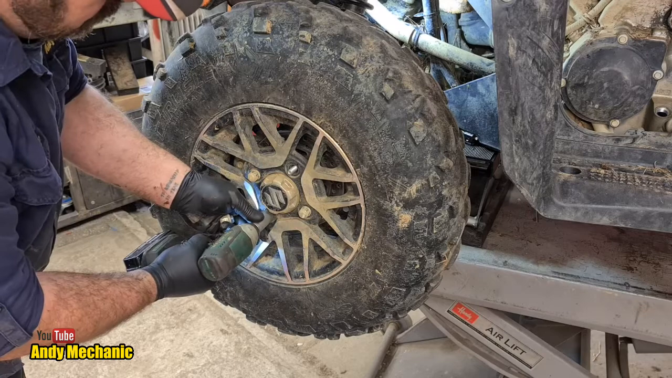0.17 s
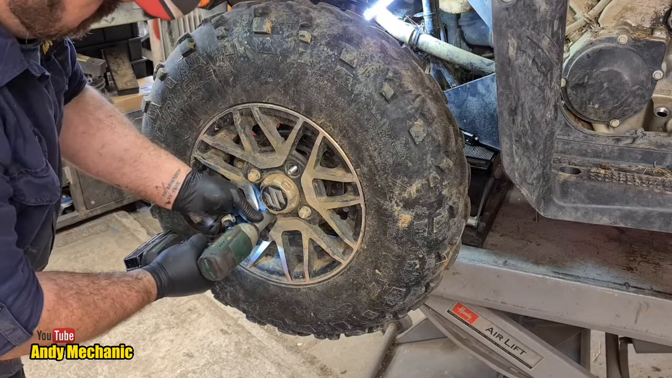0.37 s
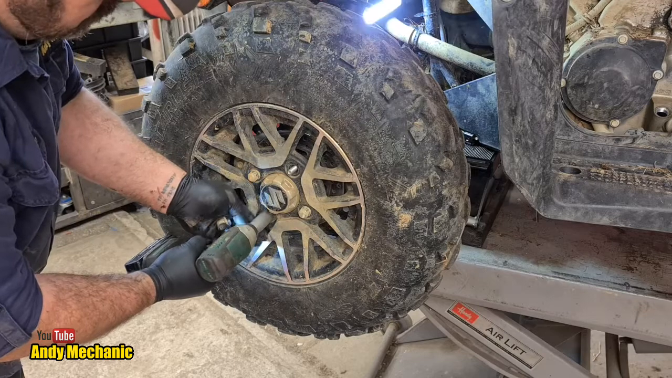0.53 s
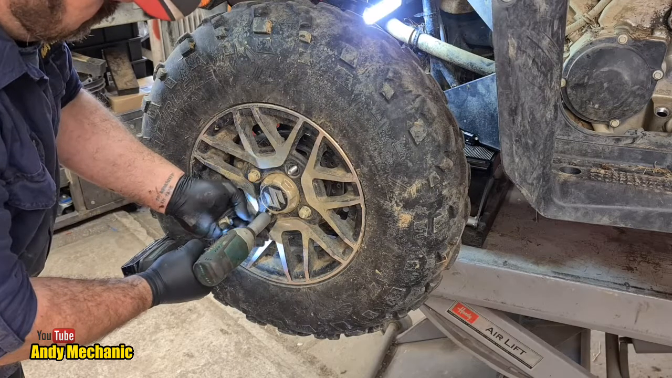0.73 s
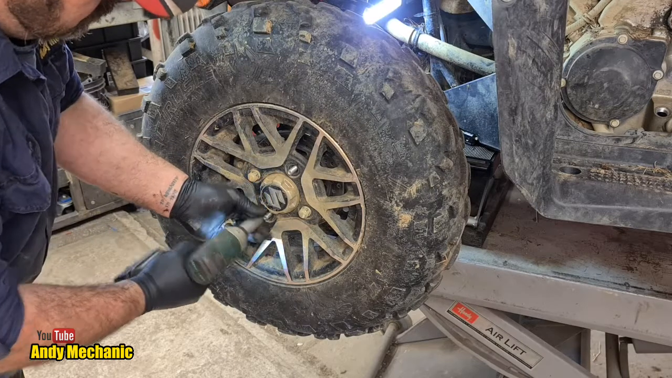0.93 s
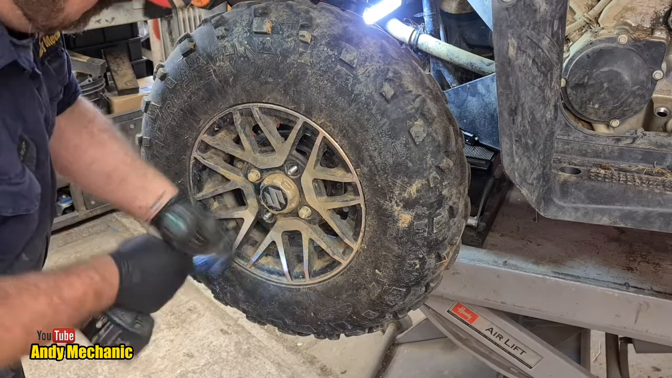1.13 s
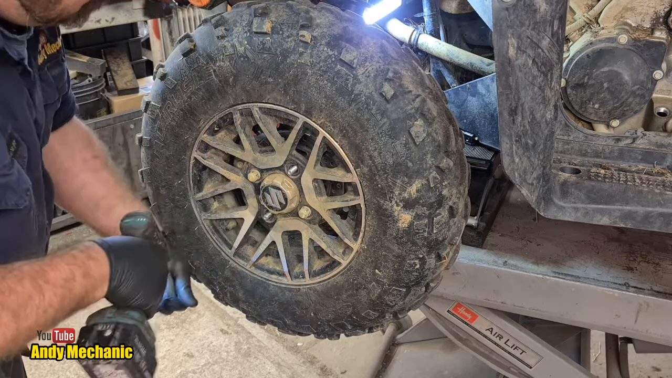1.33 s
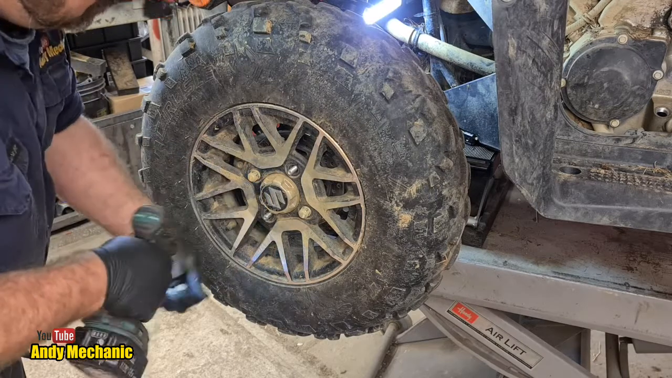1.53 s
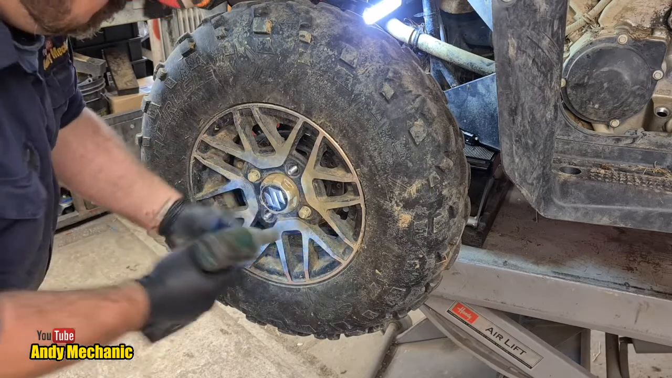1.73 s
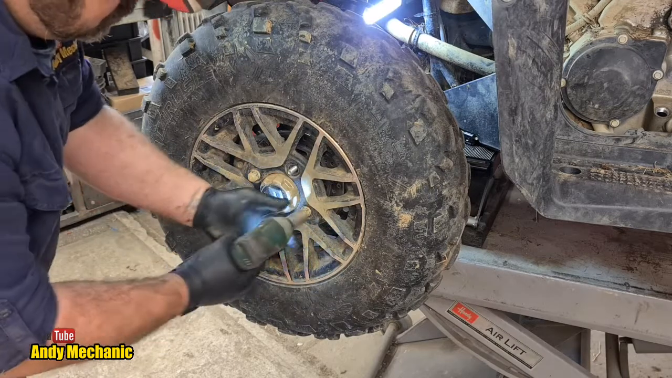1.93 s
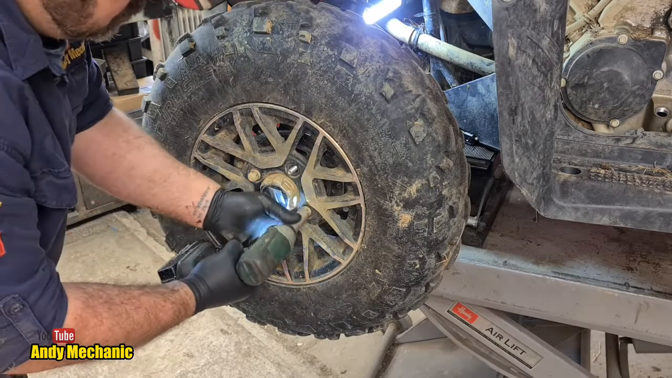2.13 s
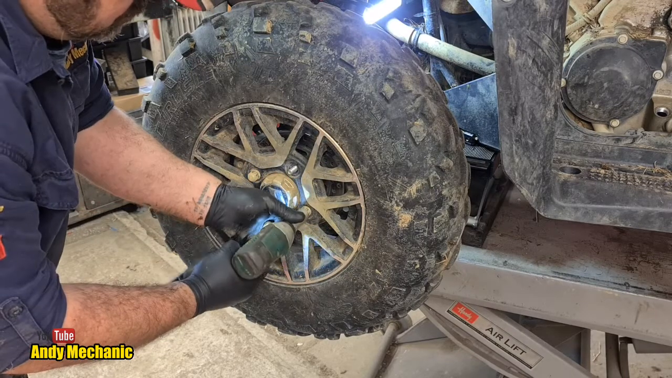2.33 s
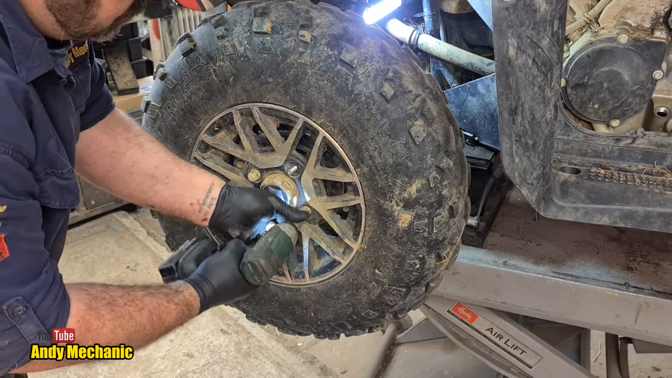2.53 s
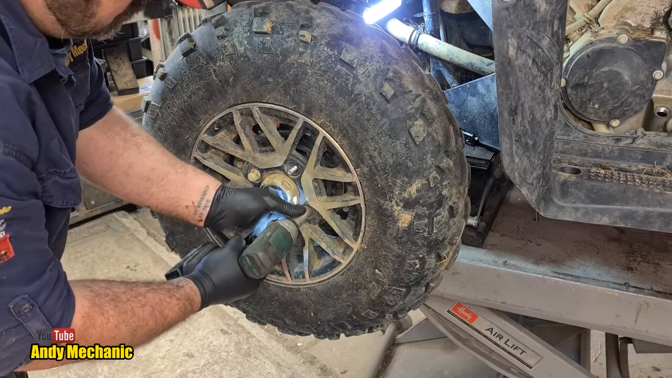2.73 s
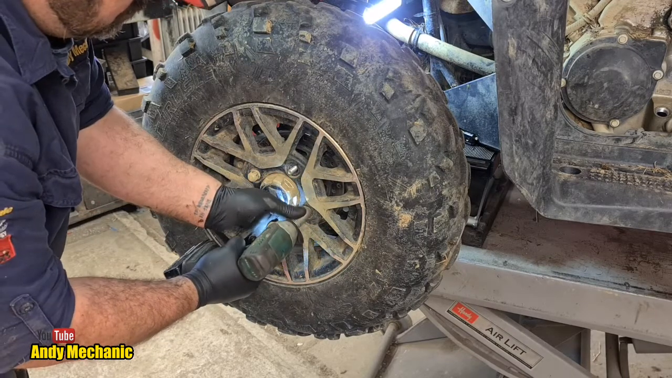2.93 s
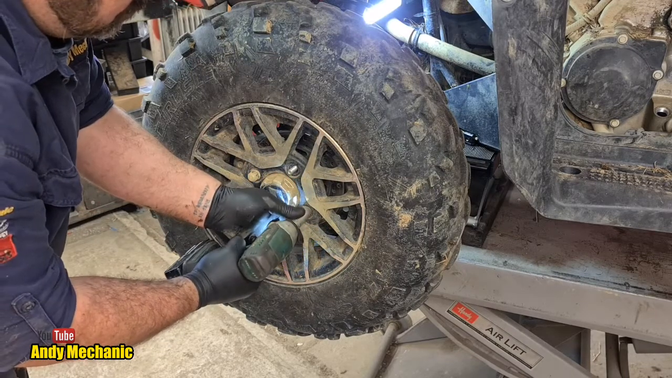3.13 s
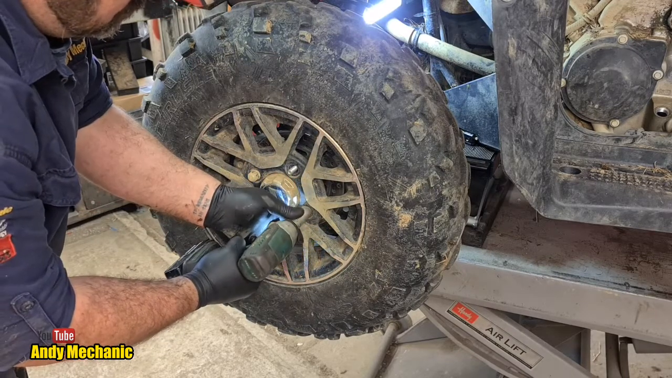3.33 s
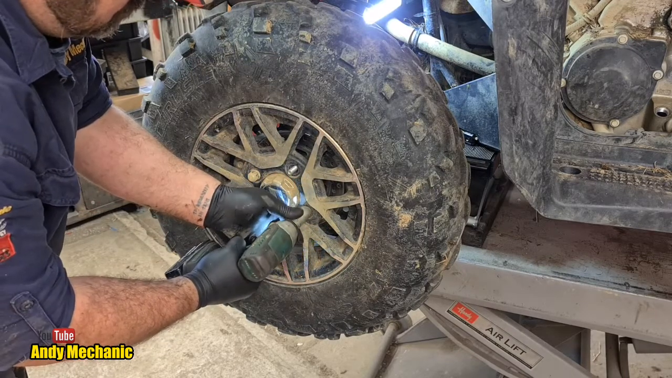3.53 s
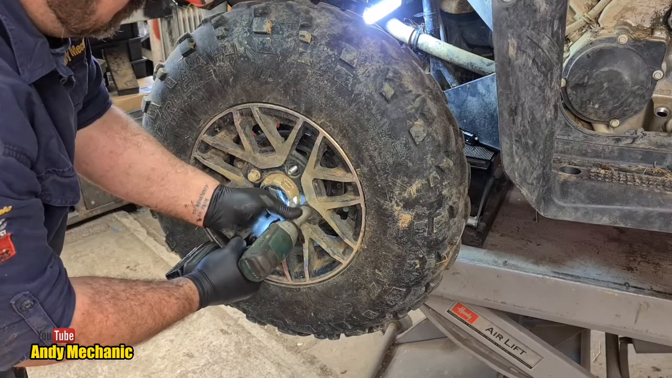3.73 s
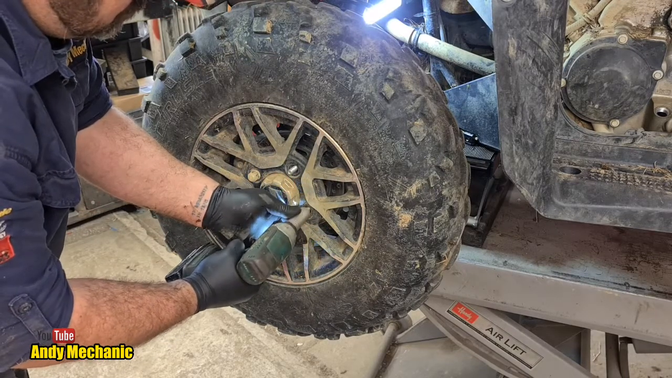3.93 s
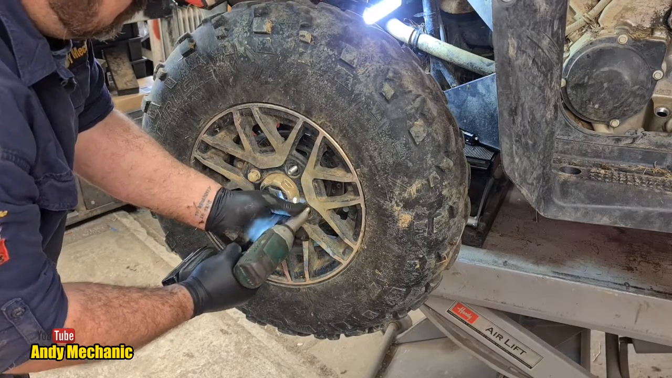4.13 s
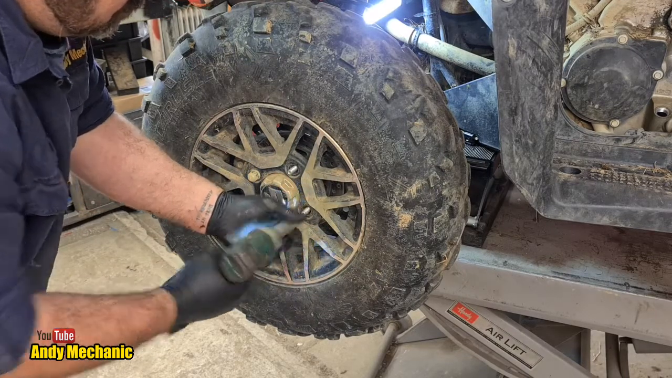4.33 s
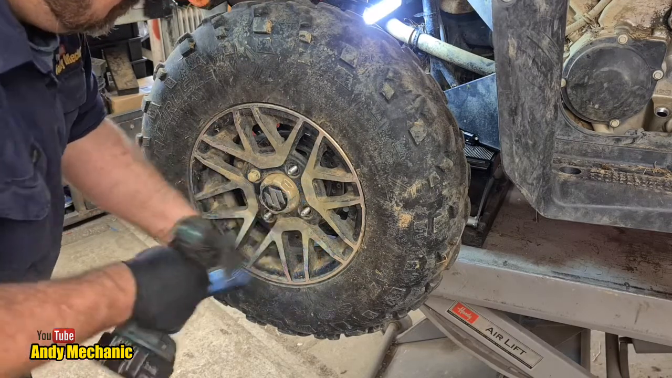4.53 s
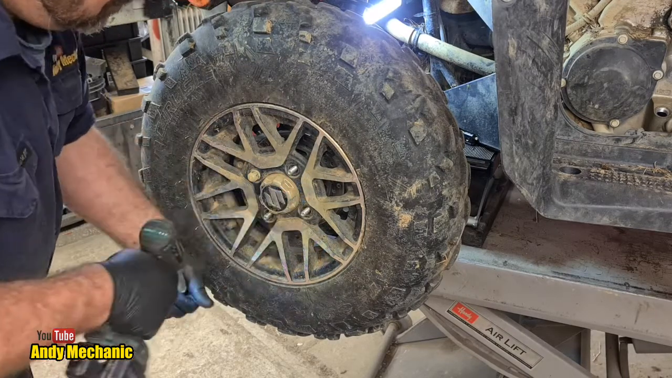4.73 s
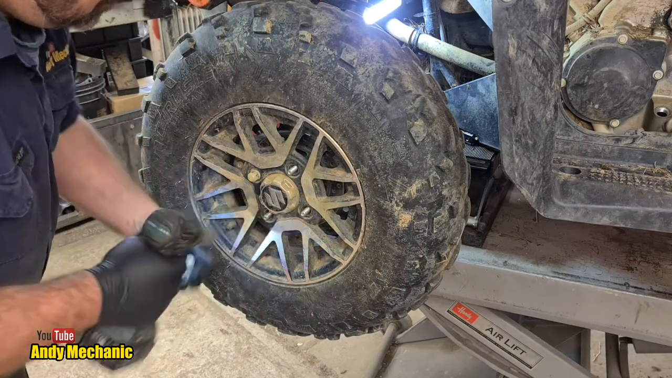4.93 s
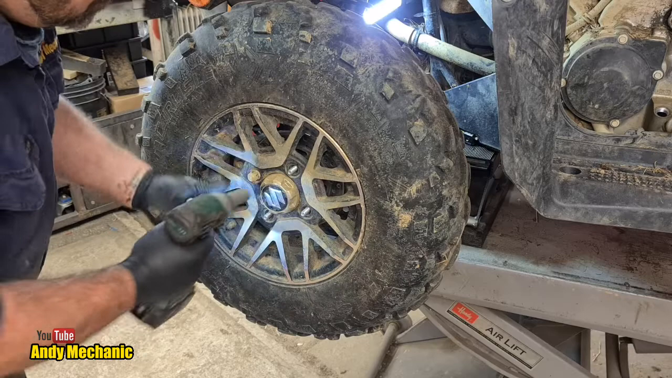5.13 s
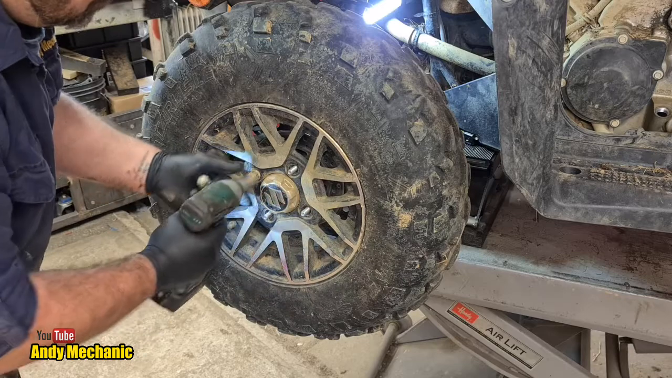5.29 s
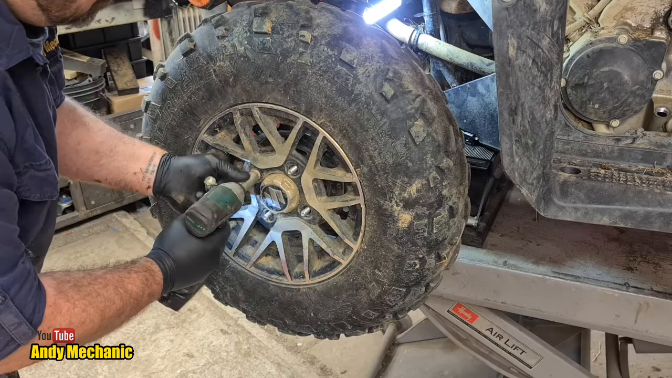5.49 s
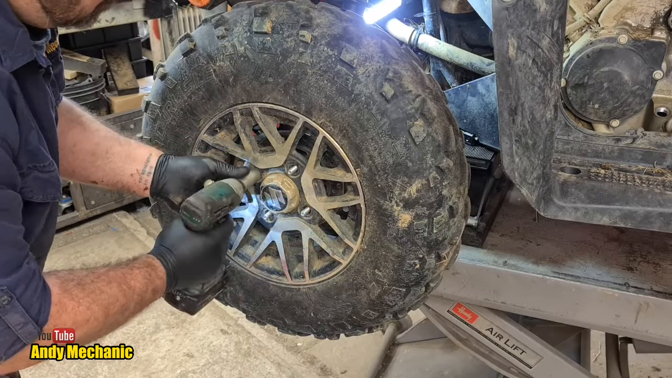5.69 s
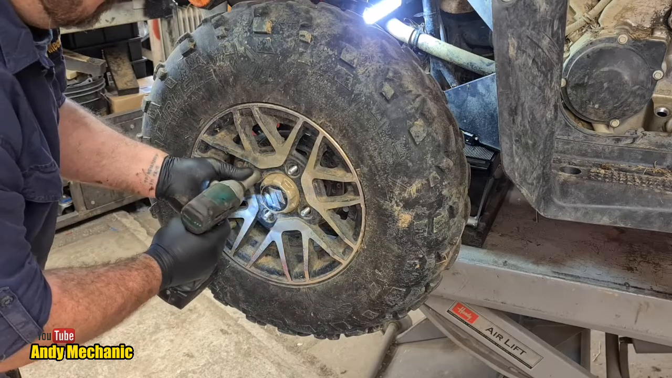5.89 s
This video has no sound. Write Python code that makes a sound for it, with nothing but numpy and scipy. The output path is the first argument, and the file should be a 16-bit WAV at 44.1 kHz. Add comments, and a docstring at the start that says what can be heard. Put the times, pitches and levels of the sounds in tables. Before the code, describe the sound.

A cordless impact wrench hammers wheel nuts loose in rapid buzzing bursts, spinning each off with gear whine and a clack, with metallic knocks between.

```python
"""Impact wrench on wheel nuts

A cordless impact wrench works on three wheel nuts in a garage, close to a stereo microphone.
Its hammer strikes about 55 times a second: bursts of noise crack and excite the wheel's resonances.
The first two nuts spin off under gear whine, made of harmonics, until the motor brakes with a clack.
In between, the socket knocks, pings and scrapes onto the next nut: short noise bursts and rings."""
import sys
import numpy as np
from scipy import signal
from scipy.fft import rfft, irfft, next_fast_len
from scipy.io import wavfile
from scipy.ndimage import map_coordinates

SR = 44100
rng = np.random.default_rng(int(sys.argv[2]) if len(sys.argv) > 2 else 0)


def unload_audio(sound):
    """Save the sound as a 16-bit wav file, at the path given as the first command line argument."""
    columns = np.transpose(np.atleast_2d(sound))
    # keep every value between -1 and 1, then stretch to whole-number steps
    steps = np.round(np.clip(columns, -1, 1) * 32767)
    wavfile.write(sys.argv[1], SR, steps.astype(np.int16))


N = 262395

# diffuse sound of the garage: (f/Hz, left-right likeness)
ROOM_LIKENESS = [(50, 0.75), (130, 0.68), (300, 0.99), (650, 0.66), (1400, 1), (3000, 0.2), (15000, 0.95)]
# direct sound of the tool: (f/Hz, left-right likeness)
DIRECT_LIKENESS = [(100, 1), (1500, 0.47), (5000, 0.46), (15000, 0.15)]
# colour of the brightest part of a steel contact: (f/Hz, level/dB)
TICK_COLOUR = [(4000, -37.5), (8000, 1.5), (11000, -5.5), (12600, -3), (14000, -6), (16000, 4)]
# the freed nut spins off:
# (start t/s, leaves the thread t/s, motor cut t/s, gear chatter at free speed level/dB,
#  thread rumble before it dies level/dB, mesh speed lost to full thread drag f/Hz)
NUT_SPINS = [(.4, 0.746, .874, -35.5, -45, 25.06), (3.76, 4.067, 4.217, -33, -39, 65)]
LOADED_HZ, FREE_HZ = 1288, 1578  # gear mesh under the hammer and running free


def amp(db):
    """Decibels to amplitude."""
    return 10 ** (np.asarray(db) / 20)


def unit(x):
    """x scaled to an rms of 1."""
    return x / np.sqrt(np.mean(x ** 2) + 1e-20)


def clock():
    """Time of every sample in seconds."""
    return np.arange(N) / SR


def ramp(t, length):
    """From 0 to 1 over a given time."""
    return np.clip(t / length, 0, 1)


def fade(t, t60):
    """Exponential decay that loses 60 dB in t60 seconds."""
    return np.exp(-np.log(1000) * t / t60)


def along(points, hz):
    """Read (Hz, value) points on a log frequency axis."""
    f, v = np.transpose(points)
    return np.interp(np.log(hz + 1), np.log(f + 1), v)


def filtered(x, response):
    """x times a response of frequency."""
    n = x.shape[-1]
    m = next_fast_len(n + 8192)  # spare room for ringing
    spectrum = rfft(x, m) * response(np.fft.rfftfreq(m, 1 / SR))
    return irfft(spectrum, m)[..., :n]


def body(modes):
    """The causal response of (Hz, width Hz, dB) resonances, alternating in sign."""
    def mode(f, centre, width, db):
        return amp(db) * 1j * f * width / (centre * centre - f * f + 1j * f * width)
    return lambda f: sum((-1) ** k * mode(f, *row) for k, row in enumerate(modes))


def noise(spectrum=((1, 0),), alike=DIRECT_LIKENESS, size=N):
    """Stereo noise of rms 1 with a given colour and left-right likeness, mixed from mid and side."""
    def mid_side(hz):
        turn = np.arccos(np.clip(along(alike, hz), -1, 1)) / 2
        return amp(along(spectrum, hz)) * [np.cos(turn), np.sin(turn)]
    mid, side = filtered(rng.standard_normal((2, size)), mid_side)
    return unit(np.array([mid + side, mid - side]))


def wobble(rate):
    """A smooth random curve, rate knots a second."""
    return map_coordinates(rng.standard_normal(int(N * rate / SR) + 4), [clock() * rate])


def strikes(times, sizes, t60, attack=0.00013):
    """A train of sharp rises that each die away."""
    t = np.arange(SR // 4) / SR
    shape = fade(t, t60) * (1 - np.exp(-t / attack))
    train = np.bincount(np.round(np.abs(times) * SR).astype(int), sizes, N)[:N]
    return signal.fftconvolve(train, shape / shape.max())[:N]


def ring(s, hz, db, width_hz, t60):
    """Gripped steel rings on a cluster of close modes: a decaying narrow band of noise."""
    t = clock()[:SR // 6]
    cluster = unit(filtered(noise(size=len(t)), lambda f: body([(hz, width_hz, 0)])(f) ** 2))
    return np.pad(amp(db) * fade(t, t60) * cluster, ((0, 0), (round(s * SR), N)))[:, :N]


def air():
    """Faint coloured noise of the garage and a slightly unsteady mains hum."""
    # garage air: (f/Hz, level/dB)
    air_colour = [(20, -11.5), (45, -8), (80, -8.5), (130, -18.5), (200, -24.5), (400, -21.5), (650, -27),
                  (1300, -34.5), (2500, -30.5), (4000, -35.5), (5500, -33.5), (8500, -43.5), (13000, -36),
                  (16000, -40.5)]
    hum = np.sin(2 * np.pi * 100 * clock() + .15 * wobble(8))
    hiss = noise(air_colour, ROOM_LIKENESS) * amp([[1.5], [-1.5]])  # left a little louder
    return amp(-66) * hiss + amp(-63.5) * hum


def garage(x, wet_db, early_db):
    """Near surfaces answer within milliseconds, then a diffuse tail dies; paths shift as the arms move."""
    # decay of the tail: (f/Hz, t60/s)
    decay = [(150, 0.49), (400, 0.3), (1000, 0.29), (2800, 0.31), (7000, 0.27), (15000, 0.22)]
    # how much the garage gives back: (f/Hz, level/dB)
    return_colour = [(120, 0), (400, -0.5), (700, -2), (1300, 0), (3500, 0.5), (15000, -0.5)]
    hop = SR // 5
    out = np.zeros((2, N + 2 * SR))
    padded = np.pad(x, ((0, 0), (hop, 2 * hop)))
    t = clock()[:SR // 2]
    for start in range(0, N + hop, hop):  # a fresh answer for each overlapping piece
        diffuse = noise(return_colour, ROOM_LIKENESS, size=len(t))
        hz, age, z = signal.stft(diffuse, SR, nperseg=256)
        z = z * fade(age, along(decay, hz)[:, None])
        tail = signal.istft(z, SR, nperseg=256)[1][:, :len(t)] * (1 - np.exp(-t / 0.002))
        early = noise(return_colour, ROOM_LIKENESS, size=len(t)) * fade(t, t60=0.063) * (t > .002)
        answer = (amp(wet_db) * unit(tail) + amp(early_db) * unit(early)) / np.sqrt(len(t))
        piece = padded[:, start:start + 2 * hop] * np.sqrt(np.hanning(2 * hop))
        wet = signal.fftconvolve(piece, answer, axes=1)
        out[:, start:start + wet.shape[1]] += wet
    return out[:, hop:hop + N]


def hums():
    """The wheel hums as the socket drags on it: short swelling tones."""
    # hums: (middle t/s, length t/s, f/Hz, level/dB)
    drags = [(.68, 0.2, 207.4, -43), (2.604, 0.086, 270, -49.5)]
    t, out = clock(), 0
    for s, length, hz, db in drags:
        swell = np.cos(np.pi * np.clip((t - s) / length, -.5, .5))
        out = out + amp(db) * swell * np.sin(2 * np.pi * hz * t + 0.21 * wobble(40))
    return out


def scrape():
    """The socket's rim grates over the nut in swelling strokes of noise and skips at its corners."""
    # strokes of the socket seeking the nut: (start t/s, length t/s, level/dB)
    strokes = [(2.18, .1, -50.5), (2.34, .05, -66), (2.48, .14, -65), (2.615, .05, -56)]
    # skips over the nut's corners: (t/s, level/dB)
    slips = [(2.209, -40.5), (2.222, -48), (2.235, -41.5), (2.249, -37.5), (2.263, -42.5), (2.281, -49.5)]
    # steel rubbing on steel: (f/Hz, level/dB)
    rub_colour = [(120, -30.5), (250, -13), (550, 0.5), (950, -10.5), (1400, -1), (3000, -5), (6000, -5.5),
                  (9000, -11), (16000, -13)]
    pressure = sum(amp(db) * np.sin(np.pi * ramp(clock() - s, length)) for s, length, db in strokes)
    slip_s, slip_db = np.transpose(slips)
    grating = pressure * unit(noise(rub_colour) * amp(3.7 * wobble(310)))
    return grating + noise(rub_colour) * strikes(slip_s, amp(slip_db), t60=.018)


def contacts():
    """Socket against nut and rim: a dull thud of the wheel under brief steel clicks and a ring."""
    # contacts, brighter when glancing:
    # (t/s, strength level/dB, tilt/dB per octave, ring f/Hz, thud of the wheel level/dB)
    touches = [(1.164, -68.5, 5, 1296, -75), (1.335, -65, 3.5, 1890, -79.5), (1.468, -59.5, -2, 1840, -87),
               (1.896, -32, 2.5, 1600, -44), (1.908, -30.5, -1, 1530, -34), (1.9123, -32, -4.5, 3200, -34),
               (2.0983, -40, 2.5, 1890, -61), (2.1637, -42.5, -2.5, 1270, -43.5),
               (2.1785, -42, 3, 4700, -65), (2.4731, -48.5, 1.5, 2450, -54), (2.53, -60, 3, 1890, -58),
               (2.5648, -59.5, 2, 3080, -51), (2.6146, -54, 2.5, 3030, -50.5), (2.68, -39, 4, 3010, -61),
               (4.381, -55, 0, 1975, -74), (4.4847, -59, 5, 1290, -76), (4.838, -43, 4, 2460, -82),
               (5.2383, -38.5, -9, 2970, -44.5), (5.2726, -28.5, -1, 3090, -40),
               (5.2877, -23.5, -3, 3120, -27), (5.433, -44.5, 3, 5060, -49),
               (5.6241, -31, -0.5, 2800, -25.5), (5.7655, -35, 2, 2800, -45)]
    # colours of what a contact excites, from dull to bright: (f/Hz, level/dB)
    thud_colour = [(70, -24), (150, -3), (230, 3), (300, -5.5), (450, 2), (700, 3), (1100, -21),
                   (2500, -50)]
    clack_colour = [(400, -31.5), (900, -5), (1500, 3), (2400, -0.5), (3500, -19.5), (7000, -49)]
    click_colour = [(1200, -28.5), (2700, 3.5), (4200, -5.5), (6200, -2.5), (8000, -24.5), (14000, -45)]
    times, strength_db, tilt, ring_hz, thud_db = np.transpose(touches)

    def sizes(part_db, octaves):  # level against the strength, octaves from the pivot of the tilt
        return amp(strength_db + part_db + tilt * octaves)
    out = noise(thud_colour) * strikes(times, amp(thud_db), t60=.06, attack=0.0011)
    out += noise(clack_colour) * strikes(times, sizes(-2, -1.1), t60=0.013, attack=0.00037)
    out += noise(click_colour) * strikes(times, sizes(4.5, 0.96), t60=0.012, attack=0.0005)
    out += noise(TICK_COLOUR) * strikes(times, sizes(0, 2.3), t60=0.011)
    for s, hz, db in zip(times, ring_hz, strength_db):
        # a light touch damps the ring less than a firm one
        out += ring(s, hz, -7 + 0.8 * db, width_hz=550, t60=0.052)
    return out


def pings():
    """Nut and socket touch lightly and ring thin and high."""
    # pings: (t/s, f/Hz, level/dB)
    touches = [(1.336, 14900, -61), (1.896, 14900, -25), (4.0875, 12800, -15.5), (4.141, 15000, -21),
               (4.669, 14900, -66), (5.24, 15000, -45)]
    return sum(ring(s, hz, db, width_hz=300, t60=0.037) for s, hz, db in touches)


def rattle():
    """The loose nut ticks irregularly in the socket late in each spin, stronger the more its thread dragged."""
    per_s, length_s = 60, .38
    most_drag_db, scatter_db = -28, 1.5  # mean level for the nut that drags most, and its spread
    out, ticks = np.zeros((2, N)), noise(TICK_COLOUR)
    most_drag = max(row[-1] for row in NUT_SPINS)
    count = int(per_s * length_s)
    for _, _, cut, _, _, drag_hz in NUT_SPINS:
        times = cut - length_s * rng.uniform(size=count)
        sizes = amp(most_drag_db + scatter_db * rng.standard_normal(count)) * drag_hz / most_drag
        out += ticks * strikes(times, sizes, t60=.015)
    return out


def brakes():
    """The rotor stops dead and throws the socket against the anvil: a resonant clack and two rings."""
    # the motor stops: (t/s, clack before the socket's resonance level/dB, low ring level/dB,
    #  high ring level/dB)
    stops = [(0.8822, 3.5, -24, -21.5), (4.2258, 2.5, -23, -9)]
    # the loose socket and anvil: (f/Hz, width f/Hz, level/dB)
    socket_modes = [(534, 220, -8.5), (1414, 204, .5), (1590, 260, -1), (2007, 400, -5.5),
                    (3000, 600, -5.5), (4260, 2000, -7.5), (5950, 1000, -5.5), (8300, 1200, -10.5),
                    (12150, 1800, -8.5), (15030, 700, -3)]
    times, clack_db, _, _ = np.transpose(stops)
    blow = noise() * strikes(times, amp(clack_db), t60=0.011)
    out = filtered(blow, body(socket_modes))
    for s, _, low_db, high_db in stops:
        out = out + ring(s, 1477, low_db, width_hz=530, t60=0.031)
        out = out + ring(s, 15100, high_db, width_hz=800, t60=.02)
    return out


def winding_up():
    """For each pull of the trigger: when it runs, gear mesh Hz, and chatter, whine and rumble dB."""
    # the motor winds up against the hammer, levels before strain and settling:
    # (start t/s, gear chatter level/dB, rumble level/dB)
    pulls = [(2.678, -24.5, -31.5), (5.765, -19.5, -34.5)]
    windup_s, rise_db, settle_db_per_s = .03, 26.5, 44.5  # the strain builds, then eases
    for start, chatter_db, rumble_db in pulls:
        running = (clock() > start) & (clock() < start + .5)
        age = clock()[running] - start
        speed = ramp(age, windup_s)
        settle_db = settle_db_per_s * age
        strain_db = rise_db * (speed - 1) - settle_db
        yield running, LOADED_HZ * speed, chatter_db + strain_db, -46.5 - settle_db, rumble_db + strain_db


def spinning_off():
    """The same for each freed nut: the motor speeds up, held back until the nut leaves the thread."""
    speed_up_s = .07  # lag from loaded to free speed
    leave_s, leave_db = 0.16, 27.5  # the rumble dies as the nut leaves the thread
    coast_s, coast_hz = .035, 90  # the speed sags as the trigger is let go
    for start, leaves, cut, chatter_db, rumble_db, drag_hz in NUT_SPINS:
        running = (clock() > start) & (clock() < cut)
        t = clock()[running]
        off = ramp(t - leaves, leave_s)
        slow_hz = (FREE_HZ - LOADED_HZ) * np.exp((start - t) / speed_up_s)
        slow_hz = slow_hz + drag_hz * (1 - off) ** 2
        slow_hz = slow_hz + coast_hz * ramp(t - cut + coast_s, coast_s)
        # whine and chatter are quieter when slower
        whine_db = -34.5 - 0.2 * slow_hz
        yield running, FREE_HZ - slow_hz, chatter_db - .018 * slow_hz, whine_db, rumble_db - leave_db * off


def motor():
    """Gears whine on mesh harmonics and chatter every fourth tooth over the nut's rumbling thread noise."""
    # gear tooth chatter: (f/Hz, level/dB)
    gear_colour = [(500, -31), (800, -12), (1100, -10.5), (1500, 1), (2000, -6.5), (3000, -4.5), (3900, -8),
                   (4600, -4), (6000, -4.5), (7000, -12), (10000, -12), (12500, -7.5), (16000, -12)]
    # nut running on its stud: (f/Hz, level/dB)
    thread_colour = [(47, -51), (80, -15), (205, -4), (242, -5), (319, -3.5), (359, -2), (563, 0.5),
                     (733, 4), (1100, -12.5), (1430, -38), (2420, -120)]
    # whine partials: (multiple of the mesh frequency, level/dB)
    partials = [(1, -8), (2, -16.5), (3, -17), (4, -17), (6, -24.5)]
    out = np.zeros((2, N))
    teeth = unit(noise(gear_colour) * amp(3.9 * wobble(220)))
    thread = unit(noise(thread_colour) * amp(2.5 * wobble(60)))
    unsteady = 1 + 0.008 * wobble(90)
    for running, mesh_hz, chatter_db, whine_db, nut_db in [*winding_up(), *spinning_off()]:
        phase = 2 * np.pi * np.cumsum(mesh_hz * unsteady[running]) / SR
        whine = sum(amp(db) * np.sin(round(k) * phase + rng.uniform(0, 1.5, (2, 1)))
                    for k, db in partials)
        chatter = teeth[:, running] * amp(chatter_db + 4.5 * np.sin(phase / 4))
        out[:, running] += chatter + amp(whine_db) * whine + amp(nut_db) * thread[:, running]
    return out


def hammer():
    """Each blow cracks through the steel, then twists the wheel, which rings low."""
    # even runs of hammer blows, before jitter: (first blow t/s, end t/s, blows per s)
    blow_runs = [(.012, .29, 55.5), (.3003, .38, 53.3), (2.7245, 3.08, 55), (3.0882, 3.19, 53.6),
                 (3.2003, 3.53, 52.9), (3.5395, 3.69, 55.4), (3.7022, 3.765, 53.8), (5.809, 5.95, 55.7)]
    # single blows off the even runs: one in mid-hammering at the very start,
    # others as the hammer catches or the nut gives: (t/s, level/dB)
    stray_blows = [(.001, -2.5), (0.4041, 0.5), (2.6947, -4), (2.712, -2.5), (2.7162, -1.5), (5.7945, -3.5)]
    # hammer on anvil: (f/Hz, level/dB)
    crack_colour = [(530, -31), (900, -5.5), (1160, -10), (1260, -3), (1570, -3.5), (2500, -5.5),
                    (2960, -1), (4200, -4.5), (4740, -2), (7140, -5.5), (8250, -3), (11300, -5.5),
                    (13000, 1.5), (15100, -3), (16000, 2.5)]
    # wheel and tyre under the blows, before the pitch ratio: (f/Hz, width f/Hz, level/dB)
    wheel_modes = [(172, 27, -23.5), (257, 52, -18), (428, 220, -14), (588, 169, -4), (700.7, 181.5, 0.5),
                   (783, 134, -0.5)]
    # one burst for each nut, levels before they evolve: (start t/s, end t/s, steel crack level/dB,
    #  treble level/dB, wheel level/dB, tyre shudder level/dB, pitch ratio of the wheel's ring)
    bursts = [(-.2, .42, -13, -5, -41.5, -44.5, 0.97), (2.696, 3.77, -12.5, -4, -39.5, -47.5, 1),
              (5.789, 6.15, -11, -3, -38.5, -53, 0.96)]
    bite_db, bite_s = 3, .12  # the first blows on a tight nut crack harder; how soon that eases
    last_db, last_s = 2, 0.23  # the last blows before it gives crack harder again
    dull_db, dull_s = 5.5, .05  # the treble is held back until the socket seats
    jolt_db, jolt_s = 8.5, 0.046  # the first blows also jolt the wheel
    grow_db_per_s = 7.5  # the wheel rings more as the nut works loose
    give_db, give_s = 12, .07  # and less once the nut gives at the end of a burst
    shudder_falls_db_per_s = 10  # while the tyre's low shake fades

    runs = [np.arange(start, end, 1 / rate) for start, end, rate in blow_runs]
    jaw = np.concatenate([(-1) ** np.arange(len(run)) for run in runs])  # two jaws hit unequally
    stray_s, stray_db = np.transpose(stray_blows)
    chance = rng.standard_normal((len(jaw), 3))
    times = np.r_[np.concatenate(runs) + .00012 * chance[:, 0], stray_s] - .0007
    sizes = amp(np.r_[.7 * chance[:, 1] + 1.1 * jaw, stray_db])
    blows = strikes(times, sizes, t60=0.013, attack=.0002)

    def upper(hz):  # share of the treble, above about 7 kHz
        return 1 / (1 + (7000 / (hz + 1)) ** 8)
    steel = noise(crack_colour)
    # the left-right pairs are balances in dB
    crack = unit(filtered(steel, lambda hz: 1 - upper(hz))) * blows * amp([[.4], [-.4]])
    treble = unit(filtered(steel, upper)) * blows * amp([[1.1], [-1.1]])
    # the torque push is much the same each time, so the wheel sounds on harmonics of the blow rate
    push_sizes = amp(0.85 * np.r_[chance[:, 2], stray_db])
    push = strikes(times + .0012, push_sizes, t60=0.0015, attack=.00005)
    push = push + 0.56 * noise() * blows
    shake = noise([(20, -4), (70, 0.5), (130, -3.5), (300, -21), (1000, -79)], ROOM_LIKENESS)
    shudder = shake * strikes(times, sizes, t60=0.064) * amp([[3], [-4]])

    out, t = np.zeros((2, N)), clock()
    for start, end, crack_db, treble_db, wheel_db, shudder_db, ratio in bursts:
        on_nut = (t > start - .1) & (t < end + .1)
        age = np.clip(t - start, 0, end - start)
        bite = bite_db * np.exp(-age / bite_s) + last_db * ramp(t - end + last_s, last_s)
        loose_db = jolt_db * np.exp(-age / jolt_s) + grow_db_per_s * age
        loose_db = loose_db - give_db * ramp(t - end + give_s, give_s)
        wheel = unit(filtered(push, lambda hz: body(wheel_modes)(hz / ratio)))
        out += on_nut * (crack * amp(crack_db + bite)
                         + treble * amp(treble_db - dull_db * np.exp(-age / dull_s))
                         + wheel * amp(wheel_db + loose_db)
                         + shudder * amp(shudder_db - shudder_falls_db_per_s * age))
    return out


def scene():
    """The tool works a little to the left, so its sound reaches that side first."""
    work = scrape() + contacts() + pings() + rattle() + brakes() + motor() + hammer()
    lead_s = 5 / SR  # left ahead of right
    side = np.array([[1], [-1]])
    direct = filtered(work, lambda hz: np.exp(1j * np.pi * hz * lead_s * side))
    room = garage(work, wet_db=-3, early_db=-12)  # tail and near surfaces, against the direct sound
    return air() + room + hums() + direct


def record(dry):
    """The recorder rounds off the highest peaks and keeps nothing above its band limit."""
    top_hz = 15850  # middle of a 400 Hz wide slope
    rounded = dry / (1 + np.abs(dry / 1.05) ** 4) ** (1 / 4)
    return filtered(rounded, lambda hz: np.clip((top_hz - hz) / 400 + .5, 0, 1))


dry = scene()
out = record(dry)
unload_audio(out)
```